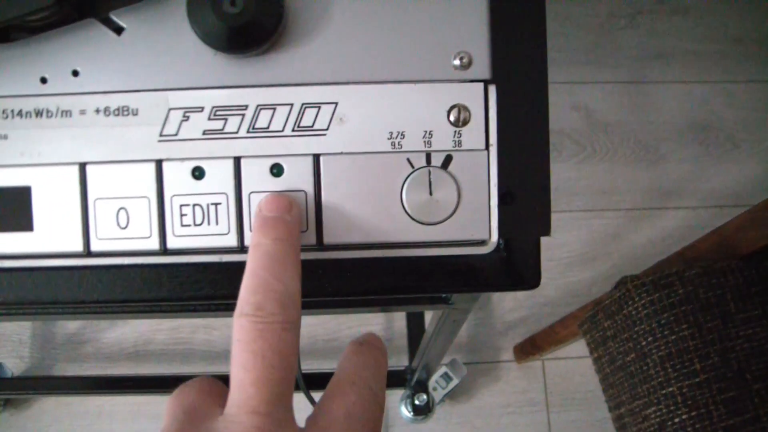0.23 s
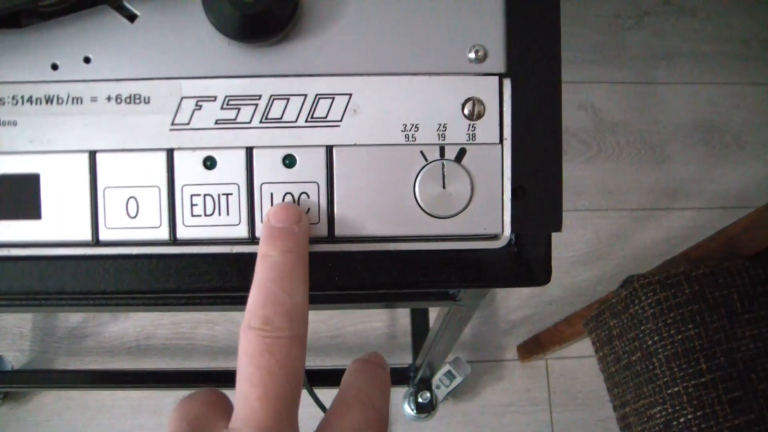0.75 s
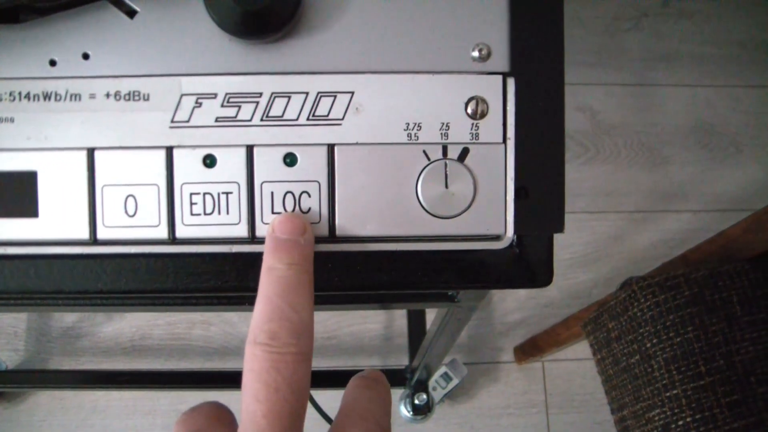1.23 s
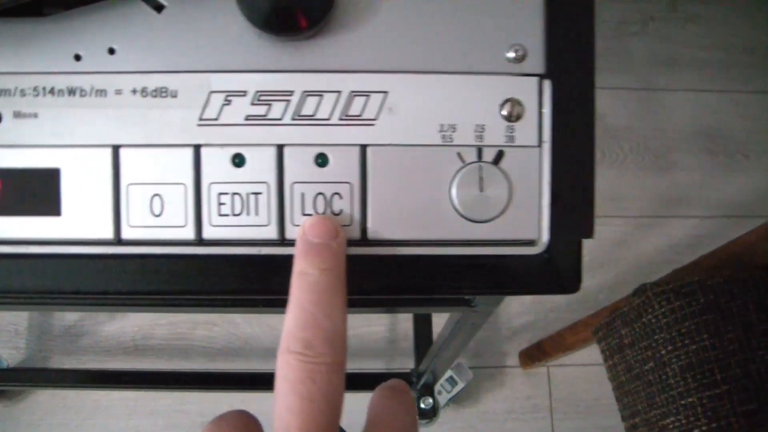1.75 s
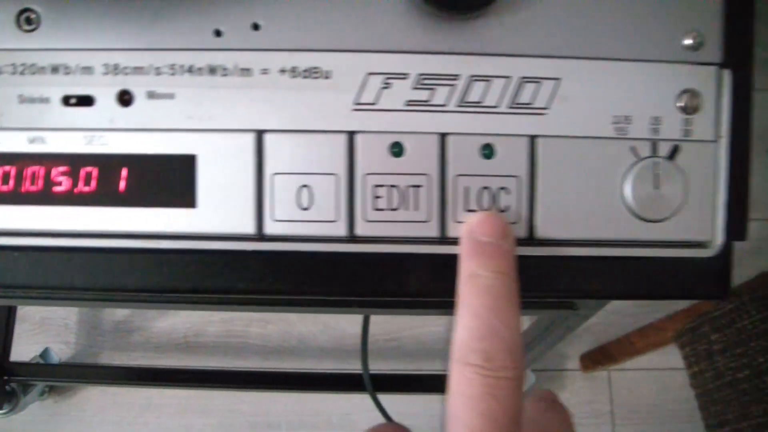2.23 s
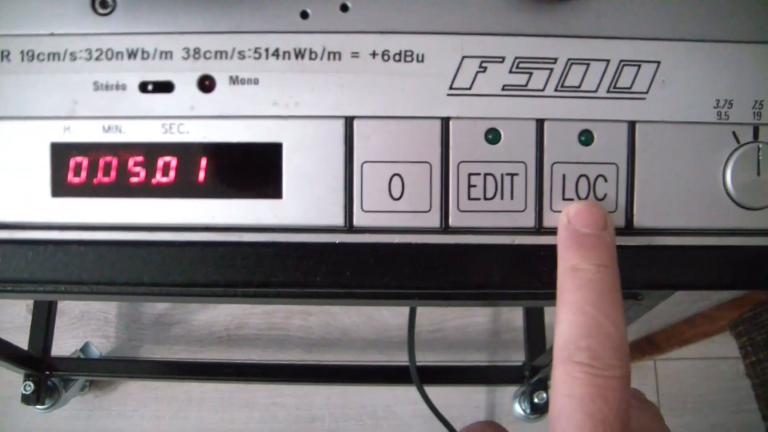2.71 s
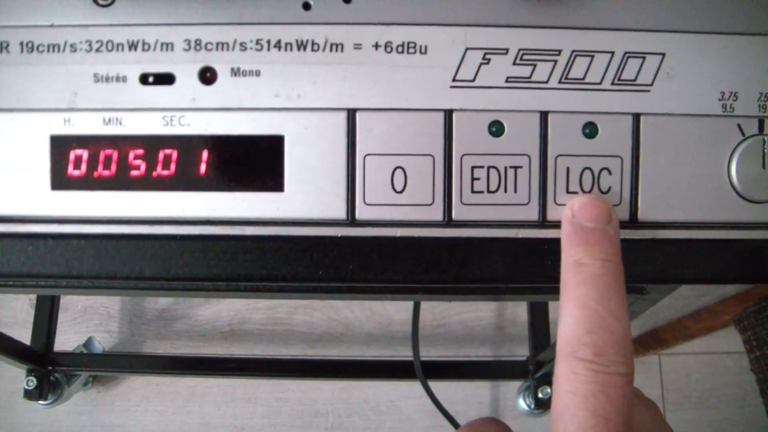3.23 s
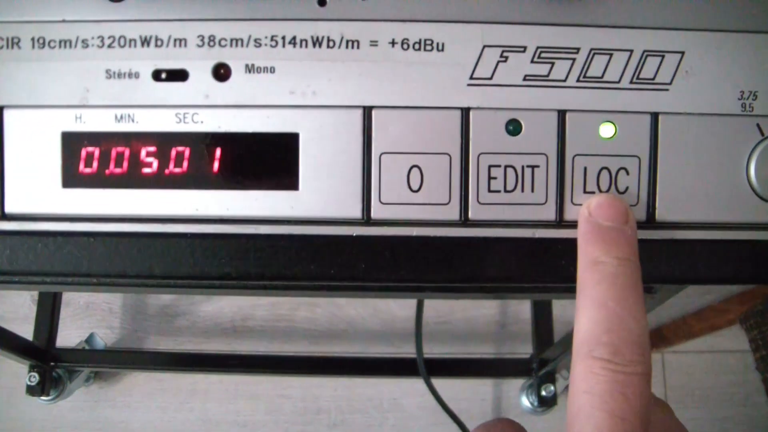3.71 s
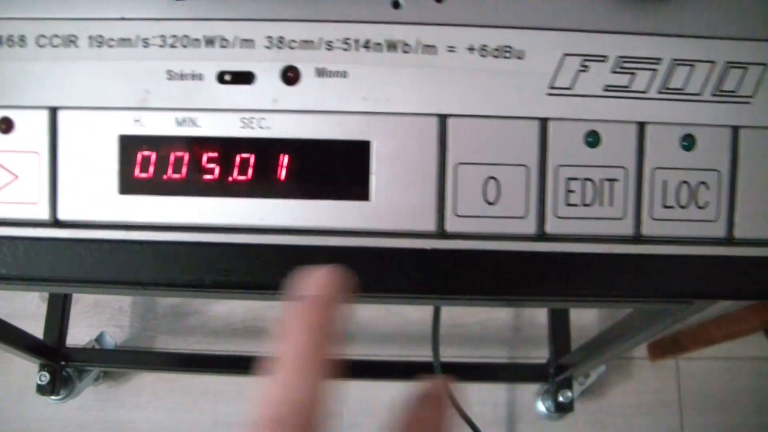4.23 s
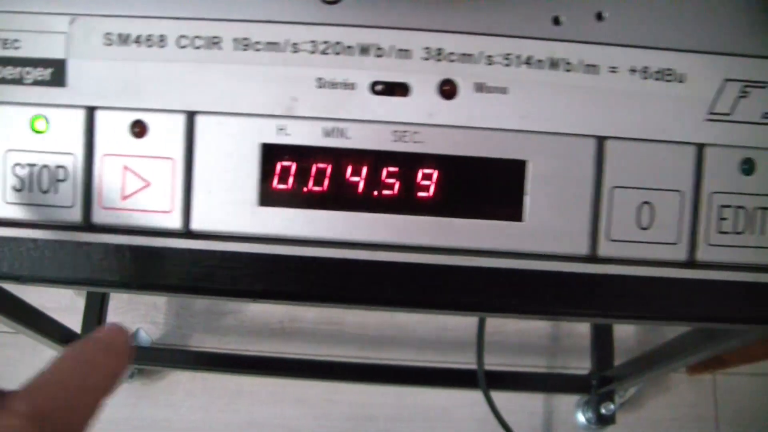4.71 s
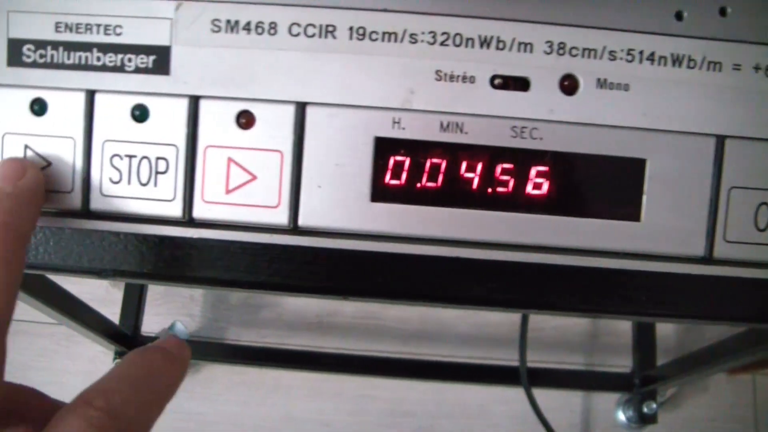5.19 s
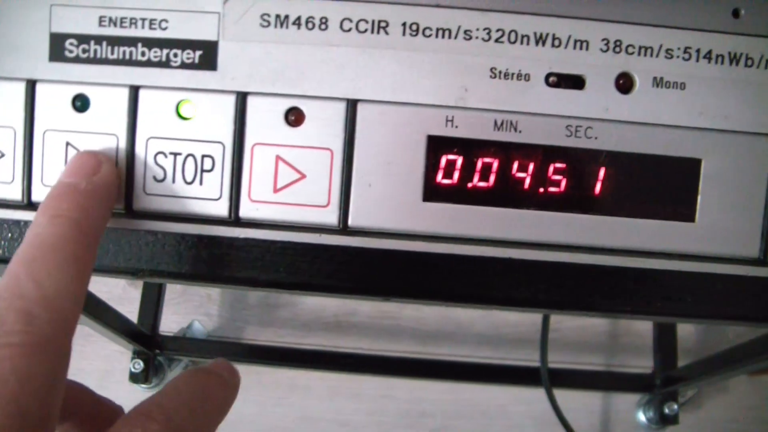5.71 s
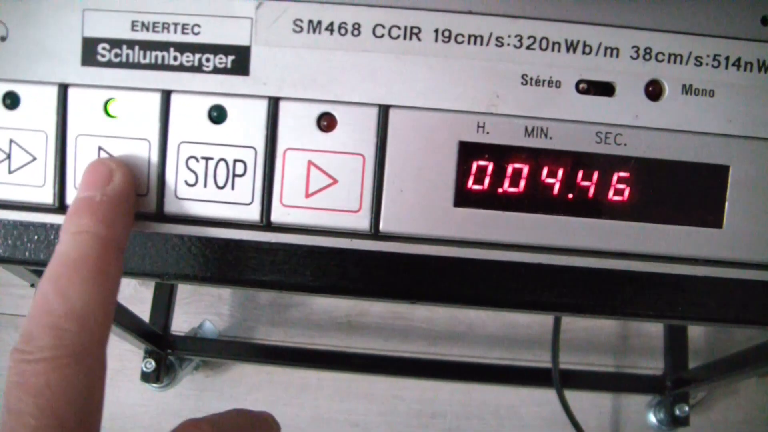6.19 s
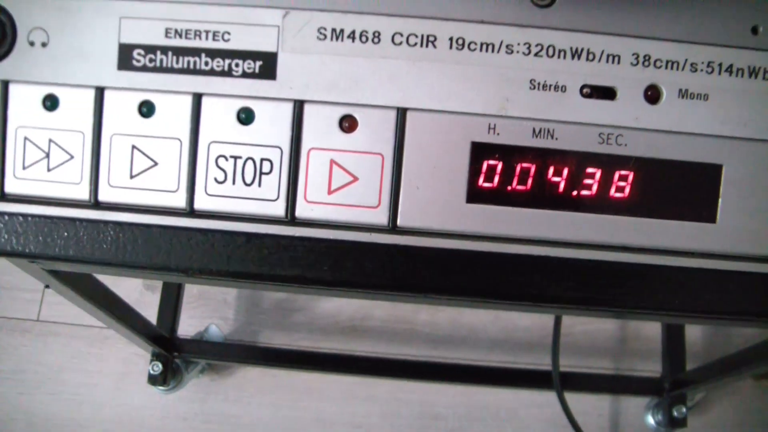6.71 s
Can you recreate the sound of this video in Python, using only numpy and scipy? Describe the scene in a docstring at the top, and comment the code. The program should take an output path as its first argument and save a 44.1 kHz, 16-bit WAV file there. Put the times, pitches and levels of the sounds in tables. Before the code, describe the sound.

In a small room, a tape machine idles with low mains hum, a thin very high whistle and soft hiss while a clock ticks faintly. After a slight finger touch on a key, brakes release with a rapid clattering clunk, and the reels spool up, their metallic whine climbing as tape hiss swells. Close stereo microphone.

```python
"""The reels of a studio tape machine spool up steadily: bearing tones, locked to the turns, climb
through the fixed resonances of deck, guide and flange while the tape hisses ever louder.
Just before, a solenoid pulls the brakes off: bouncing contacts strike chassis and steel with a clattering clunk.
A clock ticks through alternate resonant pallets and a finger touches the keys, over sine hum,
a thin electronic whistle and filtered noise for the small room."""
import sys
import numpy as np
from scipy import signal
from scipy.fft import rfft, irfft, next_fast_len
from scipy.io import wavfile
from scipy.ndimage import map_coordinates

SR = 44100
rng = np.random.default_rng(int(sys.argv[2]) if len(sys.argv) > 2 else 0)


def generate_wav(signal):
    """Clip the signal to [-1, 1] and save it as 16-bit WAV at the path in sys.argv[1]."""
    frames = np.transpose(np.atleast_2d(signal))
    scaled = np.clip(frames, -1, 1) * 32767
    pcm = np.round(scaled).astype(np.int16)
    wavfile.write(sys.argv[1], SR, pcm)


N = 306495

# Deck plate resonances. Each row: centre in Hz, width in Hz, level in dB.
DECK_MODES = [(249, 17, -3), (308.3, 9.8, 0.5), (349, 7.5, -3.5), (510, 122, -7.5), (572, 53, -3.5),
              (620.7, 28, 2.5), (758, 40.6, -0.5)]
# Tape guide resonances. Each row: centre in Hz, width in Hz, level in dB.
GUIDE_MODES = [(1874, 83, 5.5), (2160, 117, 13.5), (2320, 69, -10)]
# What the reel housings radiate. Each row: frequency in Hz, level in dB per Hz.
HOUSING_SPECTRUM = [(600, -45), (930, -5.5), (1120, 4), (1400, 1.5), (1600, 3), (1760, -7), (2480, -7),
                    (3000, -1), (3480, -3.5), (3660, -15), (4400, -6.5), (5300, -8), (7000, -26),
                    (12000, -50)]
# Reel flange, singing at speed. Each row: centre in Hz, width in Hz, level in dB.
FLANGE_MODES = [(2700, 130, -4.5), (2870, 190, 4), (3306, 127, 4.5), (3505, 130, 1)]
# Tape rubbing on the guides. Each row: frequency in Hz, level in dB per Hz.
TAPE_SPECTRUM = [(600, -18), (1300, -11), (2600, 7), (4200, 8), (5200, 1.5), (6200, 1.5), (7500, -0.5),
                 (9500, -4), (12000, -6), (14500, -4.5), (16000, -22)]
# Stereo lean of the spooling. Each row: frequency in Hz, left minus right in dB.
SPOOL_LEAN = [(60, -0.5), (130, -1.0), (290, -1), (640, 0), (1410, 0), (3100, 3), (6820, -1.5), (15000, -1)]
START_S, TURNS_GAIN = 4.5, 12.5  # start in seconds, speed gain in turns/s per second
FULL_SPEED = 30  # turns/s, reference for the levels below
CREEP = 0.17  # share of full speed at which the stalled motors already sound
SPOOL_FADE_S = 0.11  # the motors take up the load
# Each part: nominal level at full speed in dB, power of speed by which it grows.
DECK_DB, DECK_GROWS = -38.5, 1
GUIDE_DB, GUIDE_GROWS = -33, 0.73
HOUSING_DB, HOUSING_GROWS = -33, 1.48
SING_DB, SING_GROWS = -32, 3.5
HISS_DB, HISS_GROWS = -33, 1.5
FLANGE_SIDE_DB = 4.5  # the flange sits further left than the rest


def spooling():
    """Accelerating reels shake deck, guide, housings and flange; the tape hisses. Each grows as a power of speed."""
    running_s = np.maximum(clock_time() - START_S, 0)
    speed = TURNS_GAIN * running_s / FULL_SPEED
    turns = TURNS_GAIN * running_s ** 2 / 2
    drive = rolling(turns, speed)
    rung = panels(drive, t60=0.12, ring_db=-9)
    rubbing = panels(noise(), t60=0.05, ring_db=-6.0)

    def part(source, response, db, grows):
        """One radiating part; it swells by itself whenever a tone crosses one of its resonances."""
        sound = voiced(source, response, DECK_LIKENESS)
        level = amp(db) * np.hypot(speed, CREEP) ** grows
        return level * sound / sound[:, speed > 0].std()

    deck = part(drive, body(DECK_MODES), DECK_DB, DECK_GROWS)
    guide = part(rung, body(GUIDE_MODES), GUIDE_DB, GUIDE_GROWS)
    housing = part(rung, colour(HOUSING_SPECTRUM), HOUSING_DB, HOUSING_GROWS)
    flange = part(drive, body(FLANGE_MODES), SING_DB, SING_GROWS)
    flange = flange * amp([[FLANGE_SIDE_DB / 2], [-FLANGE_SIDE_DB / 2]])
    hiss = part(rubbing, colour(TAPE_SPECTRUM), HISS_DB, HISS_GROWS)
    hiss = hiss * amp(0.77 * wobble(40))  # the hiss flickers

    # fade in from the last brake contact
    engaged = np.clip((clock_time() - BRAKE_CONTACTS[-1][0]) / SPOOL_FADE_S, 0, 1)
    flutter = amp(0.86 * wobble(24))
    return engaged * placed(deck + guide + housing + flange + hiss, SPOOL_LEAN) * flutter


# Tape rollers turning with the tape. Each row: multiple of the ball-pass rate, level in dB against a bearing tone.
TAPE_ROLLERS = [(1.69, -8), (3.38, -6.5), (5.36, -6), (11.84, 0)]
BALL_PASSES = 6.275  # per turn
LOWEST_PASS, HIGHEST_PASS = 7, 32  # the bearing sounds every multiple of the ball-pass rate between these
TONE_DB, TONE_SCATTER_DB = -11, 1.5  # tone amplitude against the rolling noise at full speed, random spread
TONE_GROWS = 1.4  # power of speed by which the tones rise out of the noise
WAVY_ORDER, WAVY_WIDTH, WAVY_DB = 21.8, 2.2, 5  # a wavy race lifts the multiples around this one
THIN_BELOW = 10  # the tones weaken below this multiple


def rolling(turns, speed):
    """Bearing vibration: roughness that repeats with the turns, loose noise, and tones that climb with speed."""
    drive = noise()
    size, track_db = 2048, 5  # surface points per two turns, roughness against the loose noise in dB
    swing, slip = 0.9, 0.012
    for channel in drive:
        surface = rng.standard_normal(size)
        channel += amp(track_db) * map_coordinates(surface, [turns / 2 * size % size], mode="grid-wrap")
    drive = unit(drive)

    passes = np.arange(LOWEST_PASS, HIGHEST_PASS + 1)
    wavy_db = WAVY_DB * np.exp(-((passes - WAVY_ORDER) / WAVY_WIDTH) ** 2)
    thin_db = 10 * np.log10(1 + (THIN_BELOW / passes) ** 4)
    for order, db in TAPE_ROLLERS + list(zip(passes, wavy_db - thin_db)):
        # the load swings once a turn and gives the high tones sidebands
        sway = swing * order / 20 * np.cos(2 * np.pi * (turns + rng.random()))
        ball_slip = slip * order * wobble(10)
        phase = 2 * np.pi * order * BALL_PASSES * turns + sway + ball_slip
        force = speed ** TONE_GROWS * amp(TONE_DB + db + rng.normal(0, TONE_SCATTER_DB))
        drive += force * np.sin(phase + rng.uniform(0, 2 * np.pi, (2, 1)))
    return drive


def panels(drive, t60, ring_db):
    """The many small modes of the metal panels ring on, so passing tones flare and fade."""
    t = np.arange(SR // 6) / SR
    ring = rng.standard_normal((2, len(t))) * amp(-60 * t / t60)
    ring = ring / np.linalg.norm(ring[0])
    return drive + amp(ring_db) * signal.fftconvolve(drive, ring, axes=1)[:, :N]


# Brake linkage contacts. Each row: start in seconds, then thud, clank and crack levels in dB before trim.
BRAKE_CONTACTS = [(4.260, -25.5, -31.5, -39.5), (4.2723, -24.5, -24, -28.5), (4.280, -28.5, -24.5, -40),
                  (4.2995, -21.5, -20, -50), (4.3114, -10, -26.5, -18.5), (4.3211, -15, -22.5, -12.5)]
# Struck chassis. Each row: centre in Hz, width in Hz, level in dB.
CHASSIS_MODES = [(126, 32, -14.5), (241, 28, -1.5), (326, 110, -9.5), (585, 66, 4.5), (633, 56, 5),
                 (783, 44, -1.5), (953, 36, -6)]
# Clanking brake lever. Each row: centre in Hz, width in Hz, level in dB.
LEVER_MODES = [(1216, 220, -6.5), (1490, 194, -2.5), (1596, 91, -2), (2064, 320, -9)]
# Crack of steel on steel. Each row: frequency in Hz, level in dB per Hz.
CRACK_SPECTRUM = [(1000, -22), (1900, -16), (2800, -7), (3400, 1), (3800, 3), (4200, -3.5), (5250, -3.5),
                  (6500, -11), (8000, -15.5), (9600, -11.5), (11700, -18.5), (15000, -33)]
# Stereo lean of the brakes. Each row: frequency in Hz, left minus right in dB.
BRAKE_LEAN = [(60, -0.5), (130, -1), (290, 2), (640, 2), (1410, 0.5), (3100, 0.5), (6820, -2), (15000, -2)]
THUD_TRIM_DB, CLANK_TRIM_DB, CRACK_TRIM_DB = -9.5, -4.5, -2
# every contact bounces once, more softly
REBOUND_S, REBOUND_THUD_DB, REBOUND_STEEL_DB = 0.003, -9.5, -3


def brakes():
    """The solenoid drags its linkage over bouncing contacts and slams home; steel feeds the room most."""
    chassis, steel = np.zeros((2, 2, N))
    blows = [(0, 0, 0), (REBOUND_S, REBOUND_THUD_DB, REBOUND_STEEL_DB)]
    for s, thud_db, clank_db, crack_db in BRAKE_CONTACTS:
        for late_s, thud_loss_db, steel_loss_db in blows:
            thud = knock(body(CHASSIS_MODES))
            clank = burst(body(LEVER_MODES), t60=0.026, alike=DECK_LIKENESS)
            crack = burst(colour(CRACK_SPECTRUM), t60=0.03, alike=DECK_LIKENESS)
            add(chassis, s + late_s, amp(thud_db + thud_loss_db + THUD_TRIM_DB) * thud)
            add(steel, s + late_s, amp(clank_db + steel_loss_db + CLANK_TRIM_DB) * clank)
            add(steel, s + late_s, amp(crack_db + steel_loss_db + CRACK_TRIM_DB) * crack)
    wet = room(amp(-5.5) * chassis + amp(-2.5) * steel, build_s=0.013)
    return placed(chassis + steel + wet, BRAKE_LEAN)


# Clock case as each pallet strikes it, one list for tick and one for tock.
# Each row: centre in Hz, width in Hz, level in dB.
PALLET_MODES = [
    [(1136, 34, 2), (1390, 140, -6), (2040, 110, 0.5), (2450, 130, -4.5), (2980, 1000, -11.5)],
    [(1156, 74, 1), (1380, 140, -3.5), (2310, 190, -4), (3300, 440, -12), (4040, 52, 1.5)],
]
# Tick and tock levels in dB, before trim.
PALLET_LEVELS = [-48, -49]
FIRST_BEAT_S, SWING_S, TOCK_AFTER_S = 0.326, 0.999, 0.519  # first tick, full swing, tick to tock
PALLET_TRIM_DB = -5.5


def clock():
    """The escapement ticks and tocks once each swing on alternate pallets, heard mostly by way of the room."""
    out = np.zeros((2, N))
    for tick_s in np.arange(FIRST_BEAT_S, N / SR, SWING_S):
        beats_s = [tick_s, tick_s + TOCK_AFTER_S]
        for s, db, case in zip(beats_s, PALLET_LEVELS, PALLET_MODES):
            add(out, s, amp(db + PALLET_TRIM_DB) * burst(body(case), t60=0.12, alike=AIR_LIKENESS))
    return out + amp(4.0) * room(out, build_s=0.0021)


# Finger on the keys. Each row: start in seconds, level in dB, centre in Hz, 60 dB decay in seconds.
KEY_TOUCHES = [(0.968, -54, 290, 0.25), (.972, -55.5, 546, 0.48), (3.738, -57.5, 2500, .03)]


def finger():
    """The finger shifts on the panel, then presses the key; each touch is decaying noise through a resonance."""
    out = np.zeros((2, N))
    for s, db, hz, t60 in KEY_TOUCHES:
        resonance = body([(hz, hz * 0.4, 0)])
        # squared: the resonance is passed twice
        touch = burst(lambda f: resonance(f) ** 2, t60=t60, alike=AIR_LIKENESS)
        add(out, s, amp(db) * touch)
    return out


def idle():
    """Mains hum and the whistle of the electronics over room rumble and hiss."""
    return mains(count=14) + whistle(count=4) + background()


# Strong transformer lines. Each row: multiple of the mains frequency, mean level in dB.
HUM_LINES = [(1, -60), (2, -59.5), (4, -59.5), (10, -73)]
MAINS_HZ, BUZZ_DB = 50, -79  # BUZZ_DB: mean level of each other harmonic


def mains(count):
    """The transformer hums on a few strong mains harmonics over an even, faint buzz."""
    strong = {round(k): db for k, db in HUM_LINES}
    out = 0
    for k in range(1, count + 1):
        out = out + tone(k * MAINS_HZ, strong.get(k, BUZZ_DB) + 1.8 * wobble(2.46))
    return out


WHISTLE_HZ, WHISTLE_DB = 13025, -53.5
# mains ripple sidebands: nearest below, nearest above, fall per doubling of distance, all in dB
RIPPLE_BELOW_DB, RIPPLE_ABOVE_DB, RIPPLE_FALL_DB = -65.5, -75, 5.5


def whistle(count):
    """The electronics whistle thinly, with ripple sidebands a mains step apart and a faint lower tone."""
    out = tone(WHISTLE_HZ, WHISTLE_DB + 0.39 * wobble(3.0))
    for k in range(1, count + 1):
        fall_db = RIPPLE_FALL_DB * np.log2(k)
        out += tone(WHISTLE_HZ - k * MAINS_HZ, RIPPLE_BELOW_DB - fall_db)
        out += tone(WHISTLE_HZ + k * MAINS_HZ, RIPPLE_ABOVE_DB - fall_db)
    leaning = out * amp([[1.0], [-1.0]])  # in phase in both channels, 2 dB louder on the left
    lower = tone(9399, -77 + 2 * wobble(12))  # centred
    return leaning + lower


# Room hiss. Each row: frequency in Hz, level in dB per Hz.
AIR_SPECTRUM = [(150, -0.5), (260, -2), (370, -6), (494, -7), (749, -8.5), (1000, -7), (1080, -8),
                (12000, -15.5), (15600, -66), (22000, -120)]
# Electronic hiss around the whistle. Each row: frequency in Hz, level in dB per Hz.
FIZZ_SPECTRUM = [(4000, -30), (11000, -14), (12100, -3), (12700, 2), (13050, 4), (13600, -1), (15000, -2),
                 (15600, -30)]
# Room rumble. Each row: frequency in Hz, level in dB per Hz.
RUMBLE_SPECTRUM = [(12, 7.5), (27, 3.5), (40, -8), (70, -7), (135, -18.5), (260, -28), (400, -51)]
# Stereo likeness of the room air. Each row: frequency in Hz, left-right likeness from -1 to 1.
AIR_LIKENESS = [(25, -0.29), (70, 0.071), (200, 0.13), (600, 0.14), (1500, 0.095), (4000, -0.0025),
                (12000, 0.21)]


def background():
    """Steady coloured noises: room hiss, electronic fizz and low rumble."""
    air = amp(-55) * voiced(noise(), colour(AIR_SPECTRUM), AIR_LIKENESS)
    fizz = amp(-67) * voiced(noise(), colour(FIZZ_SPECTRUM), AIR_LIKENESS)
    rumble = amp(-52.5) * voiced(noise(), colour(RUMBLE_SPECTRUM), AIR_LIKENESS)
    return air + fizz + rumble


# Decay of the room. Each row: frequency in Hz, 60 dB decay in seconds.
ROOM_DECAY = [(150, 1), (600, 0.53), (2000, 0.46), (4500, 0.51), (8000, 0.43), (14000, 0.3)]
# Stereo likeness of machine and room answer. Each row: frequency in Hz, left-right likeness from -1 to 1.
DECK_LIKENESS = [(250, 0.98), (650, .92), (1300, 0.77), (2100, 0.14), (4000, -0.33), (9000, 0.047)]


def room(x, build_s):
    """The room's diffuse answer: it builds up, then each frequency dies at its own speed."""
    hz, t, z = signal.stft(rng.standard_normal((2, SR)), SR, nperseg=256)
    decay = amp(-60 * t / along(ROOM_DECAY, hz)[:, None])
    build = 1 - np.exp(-t / build_s)
    tail = signal.istft(z * decay * build, SR, nperseg=256)[1]
    wet = signal.fftconvolve(x, tail / np.linalg.norm(tail[0]), axes=1)[:, :N]
    return spread(wet, DECK_LIKENESS)


def knock(response):
    """One clean blow through a body, alike in both channels; rms 1 over its first 10 ms."""
    hit = filtered(signal.unit_impulse(SR // 3), response)
    return np.array([hit, hit]) / np.sqrt(np.mean(hit[:SR // 100] ** 2))


def burst(response, t60, alike):
    """A short rattle of contact through a body; rms 1 over its first 10 ms."""
    t = np.arange(SR // 3) / SR
    rattle = rng.standard_normal((2, len(t))) * amp(-60 * t / t60)
    hit = spread(filtered(rattle, response), alike)
    return hit / np.sqrt(np.mean(hit[:, :SR // 100] ** 2))


def tone(hz, db):
    """A steady-pitched sine of the given rms level."""
    return np.sqrt(2) * amp(db) * np.sin(2 * np.pi * (hz * clock_time() + rng.random()))


def noise():
    """Two unrelated white noises."""
    return rng.standard_normal((2, N))


def voiced(drive, response, alike):
    """A two-channel drive through a response, as stereo of rms 1."""
    return unit(spread(filtered(drive, response), alike))


def body(modes):
    """The causal response of (Hz, width, dB) resonances, summed with alternating sign."""
    def response(f):
        total = 0
        for k, (centre, width, db) in enumerate(modes):
            damping = 1j * f * width
            total = total + (-1) ** k * amp(db) * damping / (centre * centre - f * f + damping)
        return total
    return response


def colour(points):
    """The response of a (Hz, dB) spectrum."""
    return lambda f: amp(along(points, f))


def spread(pair, alike):
    """Two unrelated signals become left and right with the given likeness."""
    def mid_side(f):
        turn = np.arccos(np.clip(along(alike, f), -1, 1)) / 2
        return np.array([np.cos(turn), np.sin(turn)])
    mid, side = filtered(pair, mid_side)
    return np.array([mid + side, mid - side])


def placed(x, sides):
    """Each frequency leans towards one side by its left-minus-right level."""
    return filtered(x, lambda f: amp(np.array([along(sides, f), -along(sides, f)]) / 2))


def add(track, s, sound):
    """Mix a sound into the track at s seconds."""
    part = track[:, round(s * SR):][:, :sound.shape[1]]
    part += sound[:, :part.shape[1]]


def filtered(x, response):
    """x times a response of frequency."""
    length = x.shape[-1]
    m = next_fast_len(length + SR // 4)
    return irfft(rfft(x, m) * response(np.fft.rfftfreq(m, 1 / SR)), m)[..., :length]


def wobble(rate):
    """A smooth random curve, rate knots a second."""
    knots = rng.standard_normal(int(N * rate / SR) + 4)
    return map_coordinates(knots, [clock_time() * rate], mode="nearest")


def clock_time():
    """Seconds at each sample."""
    return np.arange(N) / SR


def along(points, hz):
    """(Hz, value) points read on a log axis."""
    f, v = np.transpose(points)
    return np.interp(np.log(hz + 1), np.log(f + 1), v)


def unit(x):
    """Scaled to rms 1."""
    return x / np.sqrt(np.mean(x ** 2) + 1e-20)


def amp(db):
    """Decibels to gain."""
    return 10 ** (np.asarray(db) / 20)


def scene():
    """The machine and the room around it."""
    return spooling() + brakes() + clock() + finger() + idle()


def record(dry):
    """The band limit: nothing passes above 15.4 kHz."""
    return filtered(dry, lambda hz: hz < 15400)


dry = scene()
out = record(dry)
generate_wav(out)
```